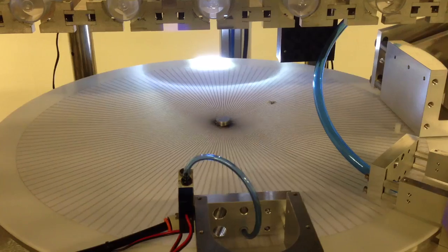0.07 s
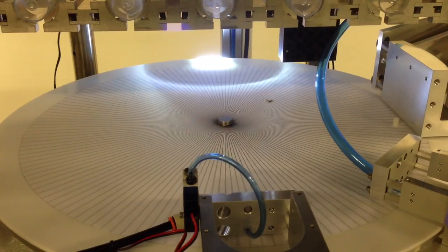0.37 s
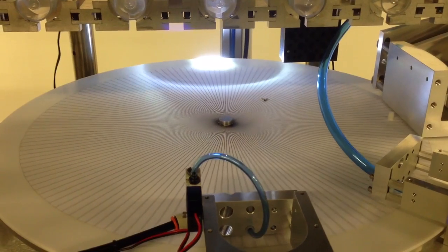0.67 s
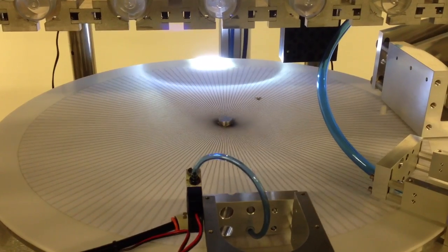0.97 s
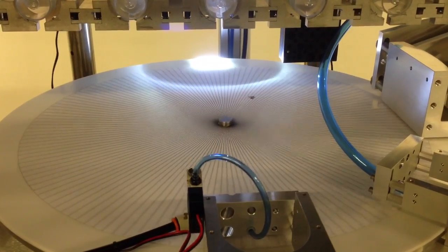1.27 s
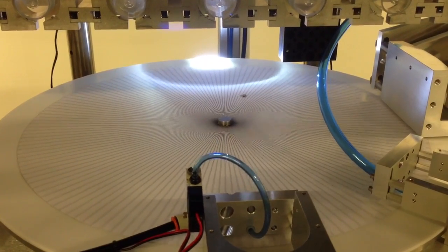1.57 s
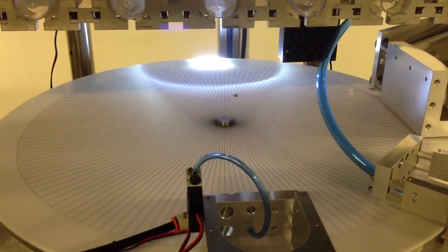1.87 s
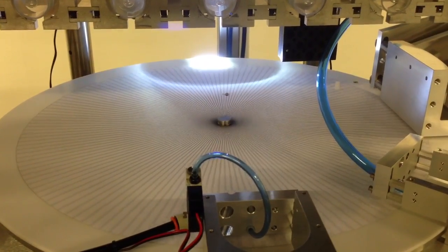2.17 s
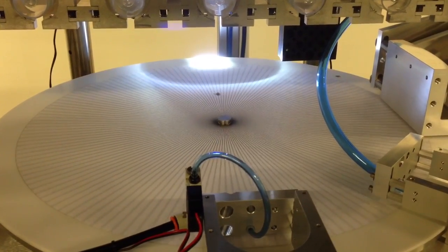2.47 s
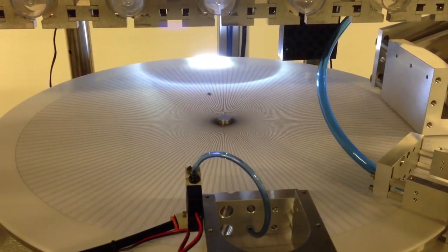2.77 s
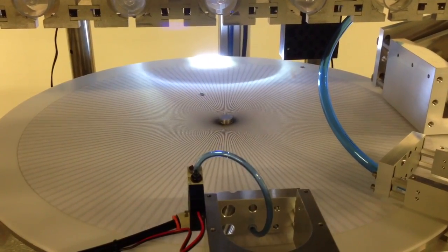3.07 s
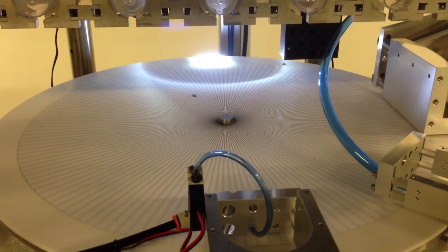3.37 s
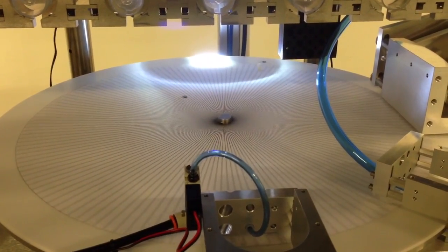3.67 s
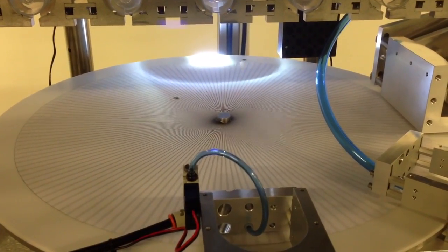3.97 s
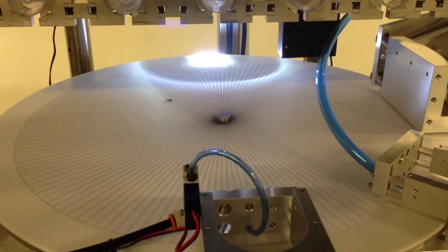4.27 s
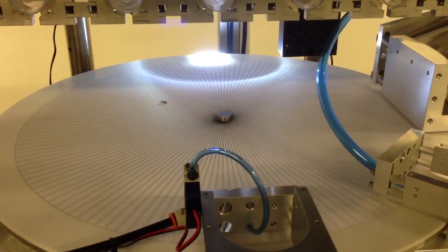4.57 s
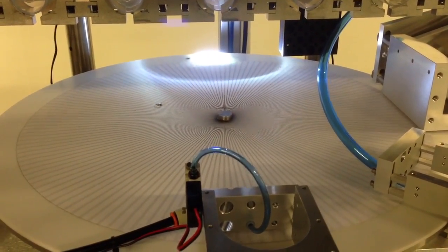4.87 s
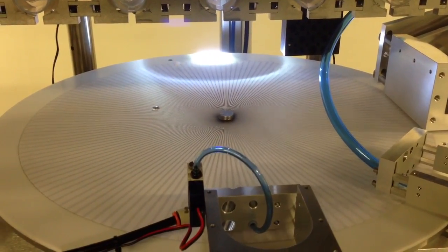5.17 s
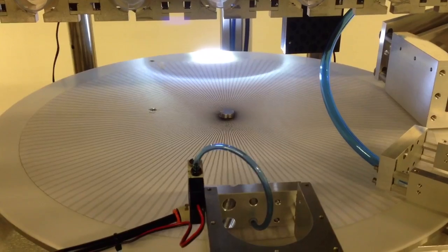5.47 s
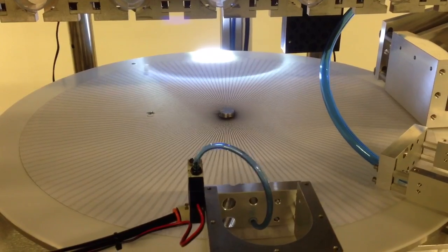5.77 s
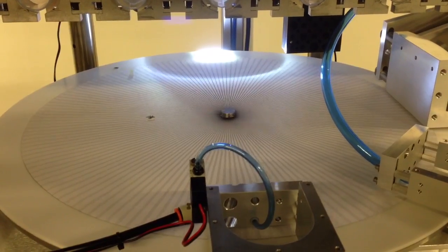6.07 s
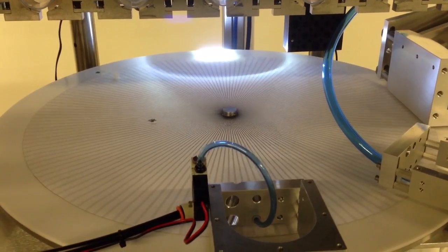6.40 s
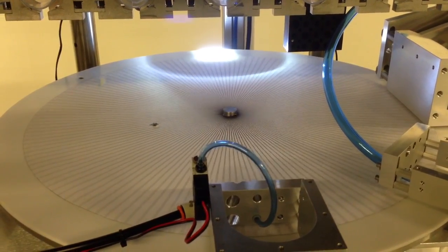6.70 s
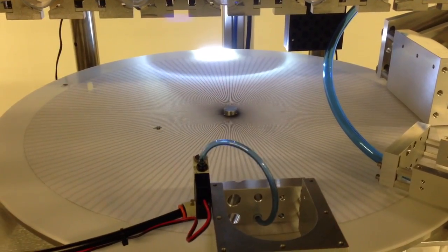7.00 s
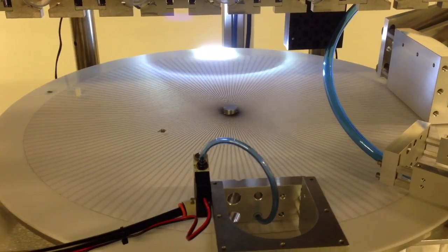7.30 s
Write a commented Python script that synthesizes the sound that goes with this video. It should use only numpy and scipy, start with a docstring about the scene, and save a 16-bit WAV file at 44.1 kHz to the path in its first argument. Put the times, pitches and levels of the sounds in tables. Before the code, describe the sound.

A steady, bright hiss of air with a slight metallic ring, close by indoors, with a fan and small motor humming underneath.

```python
"""Indoors, with the microphone close to a running optical sorting machine with a turning glass table.
Compressed air hisses steadily from a nozzle and rings the cavities of its fittings and the metal frame.
Under it a fan's turbulence rumbles in the housing, and a small motor hums faintly in wavering tones.
One microphone, in mono, with a faint hiss of its own."""
import sys
import numpy as np
from scipy import signal
from scipy.fft import rfft, irfft
from scipy.io import wavfile
from scipy.ndimage import uniform_filter1d

SR = 44100
rng = np.random.default_rng(int(sys.argv[2]) if len(sys.argv) > 2 else 0)


def master_out(mix):
    """Clip the mix to full scale and print it as 16-bit PCM to the path in sys.argv[1]."""
    frames = np.transpose(np.atleast_2d(mix))
    ceiling = np.clip(frames, -1, 1)
    pcm = np.round(ceiling * 32767).astype(np.int16)
    wavfile.write(sys.argv[1], SR, pcm)


N = 323694

# broad hiss of the air jet (frequency [Hz], level [dB per Hz])
JET_HISS = [(400, -110), (850, -92.5), (1150, -97), (1550, -84.5), (2200, -91), (2550, -94), (3100, -82),
            (4300, -86), (5000, -81), (6600, -79), (7300, -85.5), (8600, -83), (9800, -99), (12000, -125)]
# resonances of nozzle, fittings and frame (frequency [Hz], half width [Hz], level [dB per Hz])
RESONANCES = [(815, 26, -84.5), (916, 59, -86), (1380, 44, -87), (1712, 23, -80), (2030, 48, -79.6),
              (2186, 39, -90), (2347, 33, -85.5), (2882, 39, -73), (3232, 62, -78), (3310, 28, -76),
              (3450, 83, -78), (3598, 58, -76.5), (3993, 43, -69.5), (4163, 77, -71.5), (4296, 55, -67),
              (4457, 68, -70.5), (4610, 36, -74), (4823, 39, -76.5), (5140, 50, -80.5), (5376, 54, -74.7),
              (5740, 43, -79), (5900, 43, -79), (6307, 62, -73.5), (6490, 86, -75.5), (6704, 46, -78),
              (7820, 60, -81), (8180, 270, -84.5), (8680, 61, -83.5), (10652, 210, -94), (11100, 110, -103)]
# narrow bands where the paths of the hiss cancel (frequency [Hz], half width [Hz], depth [dB])
PATH_NULLS = [(1796, 24, 6), (3386, 22, 8), (3690, 69, 2.5), (3860, 23, 2), (5010, 41, 12),
              (7210, 135, 8.5), (7630, 31, 6), (7920, 57, 7), (8530, 120, 9.5), (10130, 150, 28)]
# turbulence of the fan in the housing (frequency [Hz], level [dB per Hz])
FAN_RUMBLE = [(20, -115.4), (50, -100.5), (90, -91), (118, -76.5), (150, -69), (205, -70), (290, -77.5),
              (350, -76), (410, -80), (520, -82), (700, -89.5), (1200, -92), (3000, -123.8)]
# tones of motor and fan (frequency [Hz], level [dB], pitch waver [Hz])
HUM_TONES = [(188.6, -65.5, 2.99), (266.6, -63, 2.43), (298, -73, 1.4), (380, -64, 7.01), (535, -75.5, .6)]


def air_jet(low_hz=2500):
    """Close by, the nozzle hisses and rings the cavities; eddies in the one flow make both flutter."""
    drift_db = 0.41 * walk(per_s=3.07)  # the air supply is nearly steady
    flow_db = drift_db + 0.3 * walk(per_s=28)
    paths = undb(-sum(depth * bell(hz, width) ** 2 for hz, width, depth in PATH_NULLS))
    # unrelated eddies feed the cavities, so their powers add
    cavities = np.sqrt(sum((undb(db) * bell(hz, width)) ** 2 for hz, width, db in RESONANCES))
    hiss = turbulence(slope(JET_HISS) * paths, swell_db=flow_db)
    ring = turbulence(cavities * paths, swell_db=flow_db + 0.38 * walk(per_s=5))
    air = hiss + ring
    # the large eddies are fewer, so the low end of the jet is less steady
    low = irfft(rfft(air) * (bins() < low_hz), N)
    low_flutter_db = 0.98 * walk(per_s=20)
    return air - low + low * undb(low_flutter_db)


def fan(trim_db=-0.17):
    """Under the hiss, the fan's turbulence rumbles in the housing, swelling and fluttering at random."""
    swell_db = 0.3 * walk(per_s=8)
    flutter_db = 0.72 * walk(per_s=22)
    return turbulence(slope(FAN_RUMBLE), trim_db + swell_db + flutter_db)


def motor(unsteady_db=2.):
    """In the background, faint tones of motor and fan waver in pitch and strength."""
    hum = 0
    for hz, db, waver_hz in HUM_TONES:
        pitch_hz = hz + waver_hz * walk(per_s=14)
        phase = 2 * np.pi * np.cumsum(pitch_hz) / SR
        rms = undb(db + unsteady_db * walk(per_s=5))
        hum = hum + np.sqrt(2) * rms * np.sin(phase)
    return hum


def turbulence(response, swell_db=0):
    """Random pressure of 0 dB per Hz that swells in time, then passes a frequency response."""
    pressure = rng.standard_normal(N) * np.sqrt(SR / 2) * undb(swell_db)
    return irfft(rfft(pressure) * response, N)


def walk(per_s):
    """A smooth random wander with a spread of 1, heading for per_s new values a second."""
    hold = max(int(SR / per_s), 2)
    steps = np.repeat(rng.standard_normal(N // hold + 1), hold)
    smooth = uniform_filter1d(uniform_filter1d(steps, hold), hold)[:N]
    return smooth / smooth.std()


def slope(points):
    """Gain per bin through (frequency [Hz], level [dB]) points on a log-frequency axis."""
    hz, db = np.transpose(points)
    return undb(np.interp(np.log(bins() + 1), np.log(hz), db))


def bell(hz, half_width):
    """Gain per bin of a resonance applied twice, 1 at its centre."""
    return 1 / (1 + ((bins() - hz) / half_width) ** 2)


def bins():
    """The frequency of every spectral bin, in Hz."""
    return np.arange(N // 2 + 1) * SR / N


def undb(db):
    """Decibels to gain."""
    return 10 ** (np.asarray(db) / 20)


def scene():
    """Air, fan and motor, heard from one spot close to the machine."""
    return (air_jet() + fan() + motor())[None]


def record(dry, self_noise_db=-108.5, open_at_s=0.083, fade_s=.002, top_hz=15250):
    """The microphone adds its own faint hiss, opens after a moment and cuts the top."""
    self_noise = turbulence(undb(self_noise_db))
    fade_in = np.clip((np.arange(N) / SR - open_at_s) / fade_s + .5, 0, 1)
    lowpass = signal.ellip(12, .1, 70, top_hz, fs=SR, output="sos")
    return signal.sosfilt(lowpass, (dry + self_noise) * fade_in)


dry = scene()
out = record(dry)
master_out(out)
```